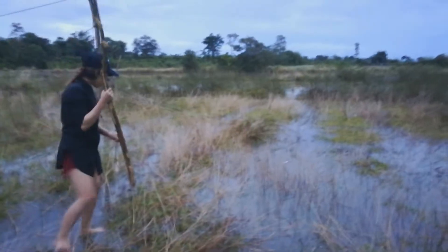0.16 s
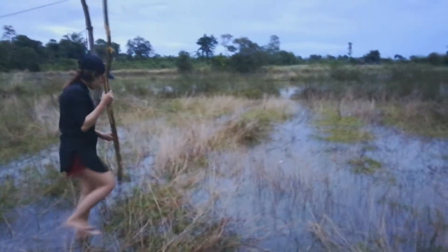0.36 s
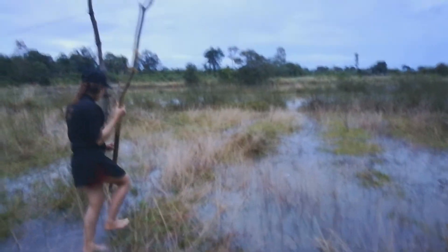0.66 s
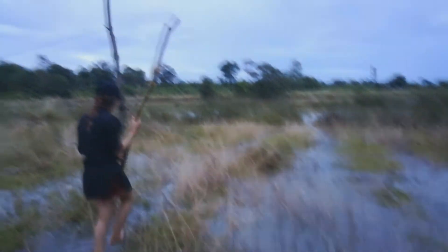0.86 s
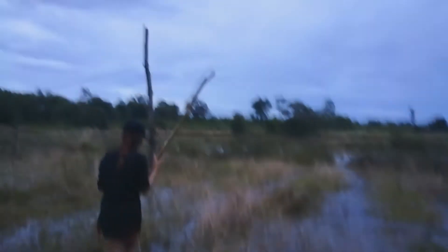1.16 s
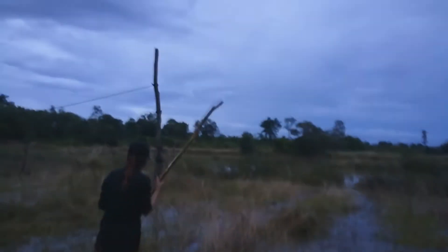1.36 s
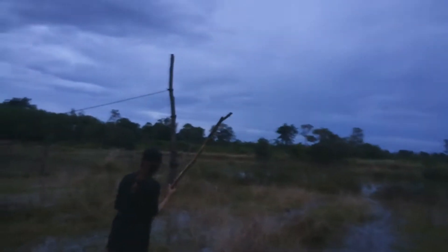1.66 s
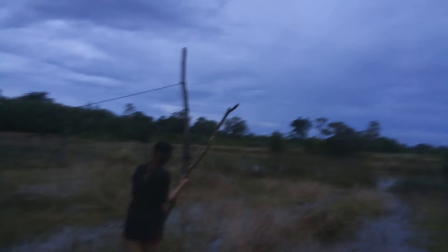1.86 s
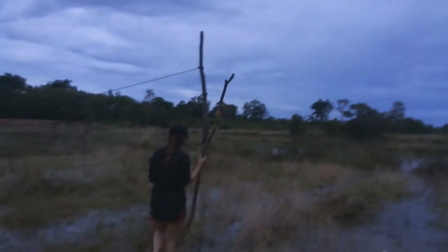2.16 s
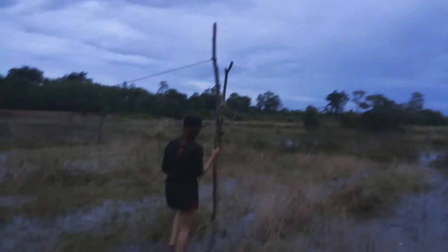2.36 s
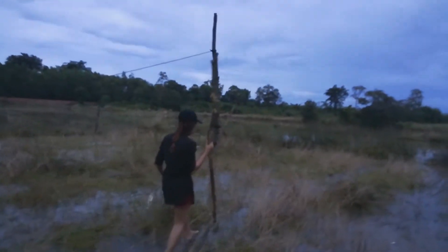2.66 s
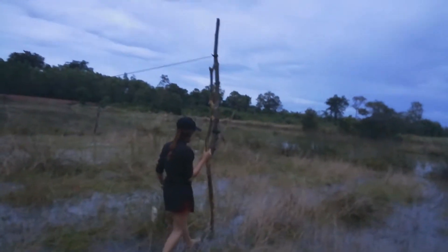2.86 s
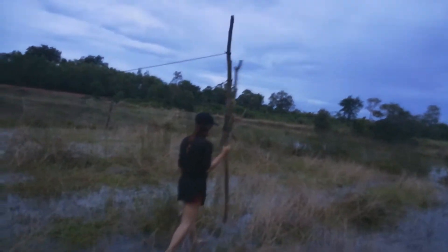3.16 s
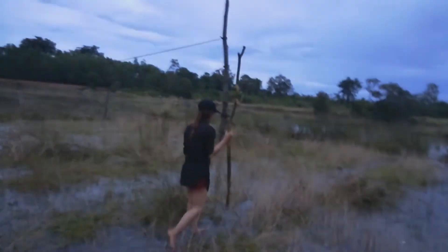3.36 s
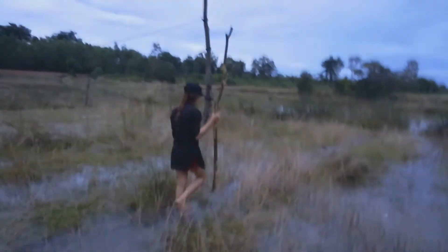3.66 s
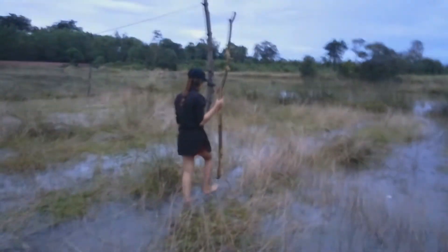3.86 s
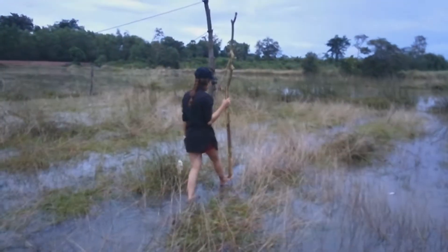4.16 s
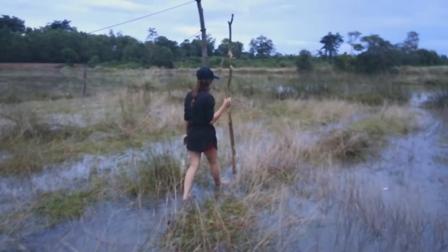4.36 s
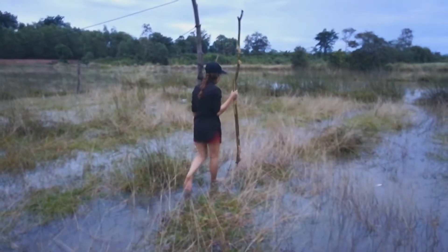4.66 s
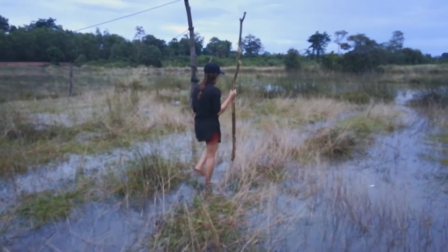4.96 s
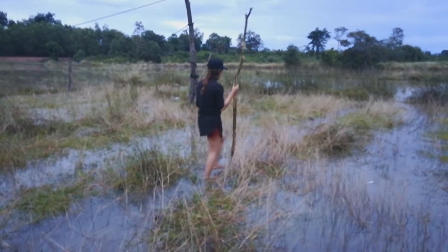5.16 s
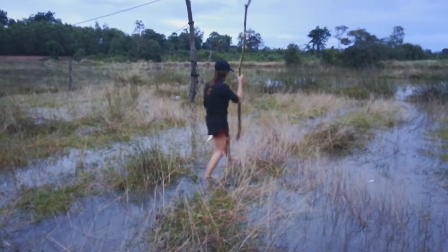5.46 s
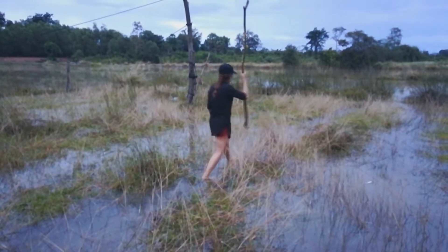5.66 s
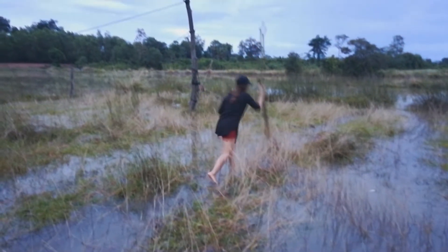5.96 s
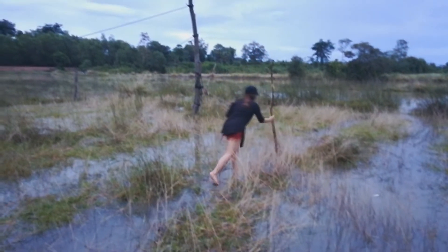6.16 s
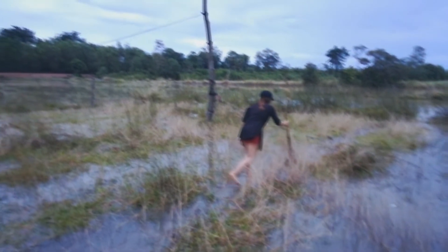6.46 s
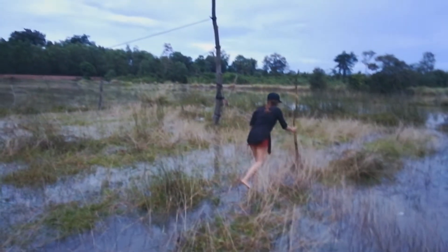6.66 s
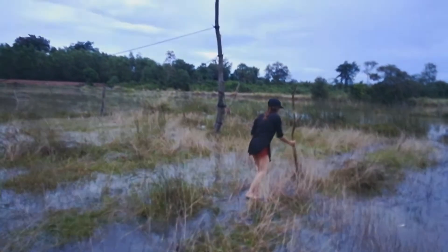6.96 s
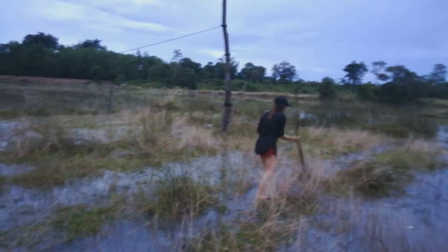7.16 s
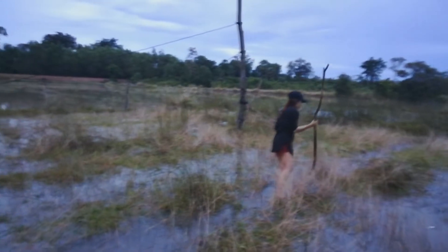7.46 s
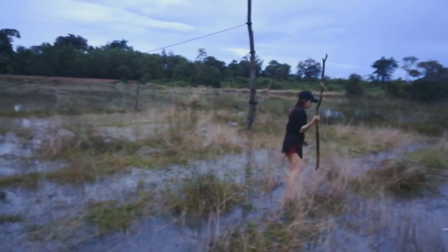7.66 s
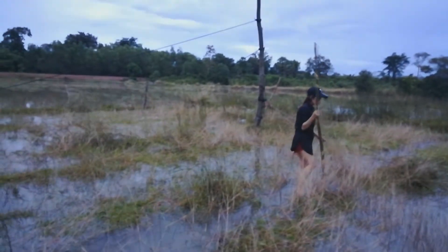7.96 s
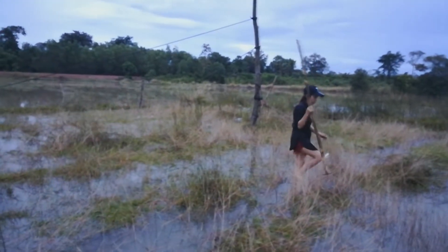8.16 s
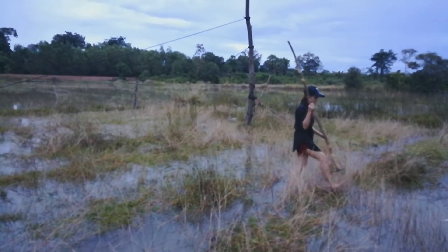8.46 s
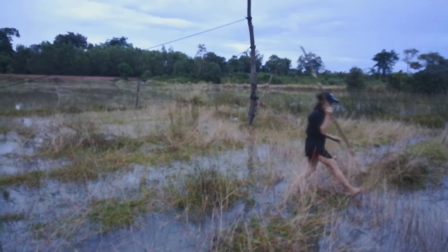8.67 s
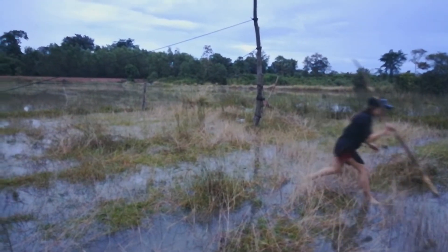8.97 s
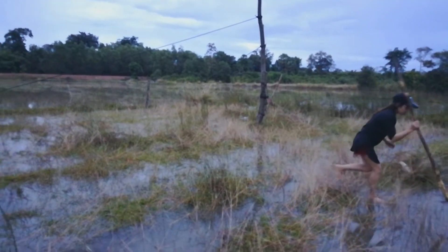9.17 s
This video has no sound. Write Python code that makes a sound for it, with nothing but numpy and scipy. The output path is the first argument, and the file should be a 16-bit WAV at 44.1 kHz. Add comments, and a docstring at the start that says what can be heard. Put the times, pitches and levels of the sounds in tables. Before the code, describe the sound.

Rapid pulsing frog croaks trade turns over a flooded field at dusk, with wet grass rustling, one sharp stick crack, and faint low engine rumble.

```python
"""Nine near frogs croak in turns at dusk over a flooded field: trains of throat pulses excite vocal resonances.
A far chorus overlaps at random; small peeps and drips are gliding tones, and a distant engine rumbles in low bands.
Someone wades through wet grass: noise crackle, ringing snaps, one stick crack, and bubbles of stirred water.
Scattering spreads the field over two ports; the left one is shaded and dull above 7 kHz.
"""
import sys
import numpy as np
from scipy import signal
from scipy.fft import rfft, irfft
from scipy.io import wavfile
from scipy.ndimage import uniform_filter1d

SR = 44100
rng = np.random.default_rng(int(sys.argv[2]) if len(sys.argv) > 2 else 0)


def master_out(mix):
    """Clip the mix to full scale and print it as 16-bit PCM to the path in sys.argv[1]."""
    frames = np.transpose(np.atleast_2d(mix))
    ceiling = np.clip(frames, -1, 1)
    pcm = np.round(ceiling * 32767).astype(np.int16)
    wavfile.write(sys.argv[1], SR, pcm)


def boost(x):
    """Linear amplitude factor 10**(x/20) for a level x in decibels (scalar or array-like)."""
    u = np.asarray(x, float) / 20
    return 10 ** u


N = 410130
TIME = np.arange(N) / SR

# Frogs that repeat one croak: name, croak length/s, opening rate over middle rate, drift of that ratio/(1/s),
# throat gains/dB, voice (attack/s, release/s, sac resonance/Hz, sac peak/dB, left minus right/dB,
# left lag/ms, end rate over middle rate)
FROG_VOICES = [ ("left", .066, 1.12, -.01, [-38, -16, -15, -7, -4, -8, -14, -17, -18, -30, -40, -33],
               (.003, .022, 3650, 8, 2.6, -.43, 1.05)),
               ("middle", .067, 1.04, -.003, [-42, -21, -22, -10, -6, -6, -16, -18, -19, -30, -42, -34],
               (.003, .022, 4050, 7, -.6, -.46, .92)),
               ("falling", .066, 1.17, -.04, [-29, -17, -12, -6, -3, -5, -10, -13, -18, -22, -36, -40],
               (.008, .024, 3400, 3, .4, -.42, .82)),
               ("thin", .048, 1.03, .07, [-36, -23, -28, -6, -3, -3, -12, -21, -18, -25, -38, -21],
               (.006, .016, 3450, 5, -8.5, .02, .95)),
               ("soft", .07, .88, .025, [-32, -21, -31, -20, -5, -3, -12, -22, -42, -48, -52, -56],
               (.025, .028, 4250, 6, -12.5, -.3, .82)),
               ("bright", .061, .92, .02, [-31, -13, -14, -8, -3, -1, -1, -5, -6, -12, -35, -29],
               (.002, .014, 4700, 2, 4.5, -.4, .94)),
               ("near", .063, 1.19, .04, [-30, -18, -21, -11, -5, -5, -11, -16, -13, -31, -36, -34],
               (.004, .02, 3900, 10, -10.5, -.28, .96)),
               ("right", .069, .91, .1, [-32, -21, -27, -18, -5, -3, -6, -15, -23, -36, -39, -29],
               (.003, .028, 3880, 10, -11.5, -.33, .92)), ]


def unit(x):
    """Normalization by the root mean square: scale to rms 1."""
    return x / np.sqrt(np.mean(x ** 2))


def response(points, size=1024):
    """Minimum phase from the folded cepstrum: a causal impulse response through (f/Hz, gain/dB) points."""
    hz, db = np.transpose(points)
    grid = np.fft.rfftfreq(size, 1 / SR) + 1
    gains = boost(np.interp(np.log(grid), np.log(hz), db))
    cepstrum = irfft(np.log(gains))
    cepstrum[1:size // 2] *= 2
    cepstrum[size // 2 + 1:] = 0
    return irfft(np.exp(rfft(cepstrum)))


def colour(x, h):
    """Linear filtering by convolution: pass every channel through an impulse response."""
    return signal.oaconvolve(x, np.atleast_2d(h), axes=1)[:, :N]


def walk(rate):
    """Smoothed random modulation: random levels held 1 / rate s, then averaged twice over that time."""
    hold = int(SR / rate)
    steps = np.repeat(rng.standard_normal(N // hold + 1), hold)
    return 1.3 * uniform_filter1d(uniform_filter1d(steps, hold), hold)[:N]


def add(track, s, sizes):
    """Band-limited impulses: clicks between samples, as short windowed sincs."""
    at = np.clip(s * SR, 8, N - 9)
    taps = np.floor(at)[:, None] + np.arange(-7, 9)
    away = taps - at[:, None]
    kernel = np.sinc(away) * np.cos(np.pi * away / 16) ** 2
    np.add.at(track, taps.astype(int), sizes[:, None] * kernel)


def throat(throat_db, sac_hz, sac_db, slack):
    """Resonant filtering: a tight and a slack throat with vocal sac peaks, scattered by stalks to each port."""
    # Frequencies of the throat gains: f/Hz
    throat_hz = [1400, 2000, 2600, 3200, 3700, 4200, 4900, 5800, 7000, 8300, 10800, 12200]
    sac_width_hz, dulling_db_per_octave = 150, -2
    hz = np.geomspace(600, 16000, 400)
    db = np.interp(np.log(hz), np.log([700, *throat_hz, 13600]), [-70, *throat_db, -57])
    for harmonic in (1, 3):  # the sac also rings at three times its frequency
        detuning = 2 * (hz / harmonic - sac_hz) / sac_width_hz
        db = db + 10 * np.log10(1 + boost(2 * sac_db) / (1 + detuning ** 2))
    dull_db = db + dulling_db_per_octave * np.log2(hz / sac_hz).clip(0)
    # a direct path followed by decaying random reflections, unlike at the two ports
    scatter = rng.standard_normal((2, 512))
    scatter = scatter * boost(-30) * np.exp(-TIME[:scatter.shape[1]] / .0035)
    scatter[:, 0] = 1
    filters = []
    for f, gain_db in ((hz, db), (slack * hz, dull_db)):
        h = signal.convolve(scatter, response(list(zip(f, gain_db)))[None])
        filters.append(h / np.linalg.norm(h, axis=1, keepdims=True))
    return filters


def frog(croaks, throat_db, voice, drop=0, accent_db=-1.2, slack=.975, jitter=.007, breath_db=-20):
    """Source-filter principle: pulses with puffs of breath ring a throat that sinks to slack times its pitch."""
    attack, release, sac_hz, sac_db, pan_db, lag_ms, ending = voice
    drop_s = .019  # the rate falls by the share drop around this time
    pulses, spent = np.zeros((2, N)), np.zeros(N)
    for s, length, start_hz, middle_hz, db in croaks:
        chance = rng.standard_normal((100, 2))
        t = np.arange(0, length, 1 / SR)
        progress = t / length
        # the rate settles quickly, holds, and bends again at the end
        bend_hz = np.where(progress < .5, start_hz - middle_hz, (ending - 1) * middle_hz)
        hz = middle_hz + bend_hz * (2 * progress - 1) ** 2
        hz = hz * (1 - drop / (1 + np.exp((drop_s - t) / .002)))
        # one pulse at each whole turn of the phase
        turns = np.cumsum(hz) / SR
        count = min(int(turns[-1]) + 1, len(chance))
        when = np.interp(np.arange(count), turns, t)
        period = 1 / np.interp(when, t, hz)
        rise = np.clip((when + period) / attack, 0, 1)
        fall = np.clip((length - when) / release, 0, 1) ** .7
        effort = rise * fall * boost(accent_db * np.exp(-when / .012))
        # the square root keeps the power the same at every pulse rate
        sizes = boost(db + 70 * jitter * chance[:count, 1]) * effort * np.sqrt(SR * period)
        when = s + when + jitter * period * chance[:count, 0]
        sizes = sizes * (when > 0)
        add(pulses[0], when + lag_ms / 1000, sizes * boost(pan_db))
        add(pulses[1], when, sizes)
        at = int(s * SR) + np.arange(len(progress))
        spent[at.clip(0, N - 1)] = progress
    puff = unit(np.exp(-np.arange(0, .003, 1 / SR) / .0009)) / np.sqrt(.003 * SR)
    breath = colour(np.abs(pulses), puff) * rng.standard_normal((2, N))
    drive = pulses + boost(breath_db) * breath
    tight, loose = throat(throat_db, sac_hz, sac_db, slack)
    return colour(drive * (1 - spent), tight) + colour(drive * spent, loose)


def croaker(name, length, opening, drift, throat_db, voice):
    """Pulse-rate modulation: a frog repeats one croak while its rate and opening bend drift through the bout."""
    # Croaks of each frog: t/s, level at the right port before field and input gain/dB
    croak_times = { "left": [(1.112, -25), (1.376, -27), (1.609, -26), (1.855, -26.8), (2.11, -28.9),
                   (2.39, -28), (2.622, -28.4), (2.836, -25.5), (3.051, -25.9), (3.262, -27), (3.48, -27.2),
                   (3.7, -26.3), (3.905, -27), (4.118, -27), (4.349, -27)], "middle": [(0.232, -28.5),
                   (0.447, -32), (0.553, -27.5), (0.845, -32), (1.67, -25.9), (1.812, -25.2), (1.979, -27),
                   (2.263, -28.3), (2.539, -28.3), (2.813, -28), (3.11, -28.3), (3.405, -28.5), (4.6, -28)],
                   "falling": [(6.325, -37), (6.555, -33.5), (6.79, -32.8), (7.02, -32), (8.94, -28)],
                   "thin": [(0.755, -27.4), (0.977, -26.1), (1.192, -24.9), (1.405, -23), (2.018, -23.4)],
                   "soft": [(2.968, -37), (3.33, -30.5), (3.59, -28.3), (4.66, -28), (5.212, -29.3),
                   (5.465, -35.3), (5.72, -28.6), (5.982, -32), (6.223, -32.6), (9.141, -25), (9.19, -25)],
                   "bright": [(6.835, -31), (7.101, -30.5), (7.35, -30.2), (7.586, -30.5), (7.811, -30.5),
                   (8.036, -30.5), (8.249, -30.5), (8.475, -30.5), (8.702, -30), (8.93, -29.5),
                   (9.165, -30)], "near": [(-0.024, -17), (0.178, -17), (0.394, -18), (0.601, -19),
                   (0.816, -18)], "right": [(6.973, -23), (7.24, -19.5), (7.48, -21), (7.708, -21),
                   (7.926, -20), (8.141, -20), (8.359, -20), (8.57, -20), (8.791, -20.5), (9.028, -21)], }
    # Mid-croak pulse rate of each frog: t/s, f/Hz
    pulse_rates = {"left": [(1.6, 453), (3.5, 427)], "middle": [(0.3, 456), (3.2, 432)],
                   "falling": [(6.55, 553), (6.8, 513), (8.9, 469)], "thin": [(0.75, 501), (1.2, 464)],
                   "soft": [(3.3, 578), (5.75, 548), (6.2, 491), (9.1, 469)], "bright": [(6.83, 260),
                   (7.1, 360), (8.0, 416)], "near": [(0.4, 486), (0.6, 480)], "right": [(7.25, 448),
                   (7.5, 421), (8.4, 438)]}
    s, db = np.transpose(croak_times[name])
    hz = np.interp(s, *np.transpose(pulse_rates[name]))
    opening_hz = hz * (opening + drift * (s - s[0]))
    return frog(zip(s, length + 0 * s, opening_hz, hz, db), throat_db, voice)


def far_chorus(count=260):
    """Superposition of incoherent sources: many distant frogs overlap at random and hush for a moment."""
    lull_s, lull_width_s, lull_db = 5.65, .5, -9
    croaks = []
    for a, b, c in rng.random((count, 3)):
        s = 9.2 * a
        lull = lull_db * np.exp(-((s - lull_s) / lull_width_s) ** 2)
        croaks.append((s, .07, 400 + 140 * b, 380 + 140 * b, -57 + 11 * c + lull))
    voice = (.02, .02, 3900, 3, -6.5, -.2, .97)  # columns as in FROG_VOICES
    return frog(croaks, FROG_VOICES[1][-2], voice, jitter=.015, breath_db=-8)


def air(db=-63):
    """Incoherent broadband noise: faint hiss of the open field, unrelated at the two ports."""
    # Spectrum of the hiss: f/Hz, gain/dB
    hiss_spectrum = [(150, 2), (600, -11), (1500, -9), (4000, -4), (7000, -14), (9500, -4), (15000, -14)]
    hiss = unit(colour(rng.standard_normal((2, N)), response(hiss_spectrum)))
    return boost(db + 1.5 * walk(2)) * hiss


def engine():
    """Narrow-band noise and a pure tone: wavering low bands and a hum of steady pitch, alike at both ports."""
    # Rumble bands: centre f/Hz, width/Hz, level before the sum is scaled to rms 1/dB
    rumble_bands = [(53, 22, -63), (68, 10, -58), (92, 16, -57), (125, 20, -62), (210, 130, -75)]
    # Rumble through time: t/s, level/dB
    rumble_level = [(1.3, -53), (2.1, -50), (2.6, -58), (3.3, -50), (4.6, -56), (5.8, -52.5), (8.0, -54),
                    (9.1, -52)]
    # Hum through time: t/s, level/dB
    hum_level = [(1.0, -85), (4.5, -73), (9.0, -77)]
    hum_hz = 270.7
    rumble = 0
    for hz, width, db in rumble_bands:
        band = signal.butter(2, [hz - width / 2, hz + width / 2], "band", fs=SR, output="sos")
        noise = unit(signal.sosfilt(band, rng.standard_normal(N)))
        rumble = rumble + boost(db + 1.5 * walk(1.3)) * noise
    hum_db = np.interp(TIME, *np.transpose(hum_level)) + 1.5 * walk(.8)
    hum = boost(hum_db) * np.sqrt(2) * np.sin(2 * np.pi * hum_hz * TIME)
    return unit(rumble) * boost(np.interp(TIME, *np.transpose(rumble_level))) + hum


def ring(s, hz, db, t60):
    """Damped oscillation: one struck mode that decays exponentially, 60 dB in t60 seconds."""
    t = np.clip(TIME - s, 0, 3 * t60)
    onset = np.clip(t * hz / 1.3, 0, 1)
    return boost(db - 60 * t / t60) * np.sin(2 * np.pi * hz * t) * onset * (t < 3 * t60)


def wet_grass():
    """Shot noise: dense crackle of wet stalks over hiss, swelling with each stride."""
    # Strides: t/s, length/s, level before slow random wavering/dB
    strides = [(3.7, .16, -50), (5.24, .65, -54), (6.072, .05, -39), (6.12, .2, -54), (6.3, .48, -46.5),
               (8.68, .2, -49), (8.88, .42, -52)]
    # Spectrum of the crackle and hiss: f/Hz, gain/dB
    grass_spectrum = [(450, -26), (1200, -13), (4500, -6), (6800, -18), (9000, 0), (12200, -5),
                      (15500, -12)]
    rise, fall = .12, .25  # shares of the stride
    gain = 0
    for s, length, db in strides:
        ramp = np.minimum((TIME - s) / rise, (s + length - TIME) / fall) / length
        gain = gain + boost(db) * np.clip(ramp, 0, 1) ** 2
    struck = rng.random(N) < .02 * boost(5.5 * walk(60))
    ticks = boost(2.6 * rng.exponential(size=N)) * struck * rng.standard_normal(N)
    crackle = unit(ticks) + .7 * rng.standard_normal((2, N))
    return unit(colour(crackle, response(grass_spectrum))) * gain * boost(3 * walk(14))


def snapping_stalks():
    """Impulsive fracture: a ringing tick inside a longer burst of splinters, high-passed."""
    # Snaps: t/s, tick scale before the high-pass/dB, ring f/Hz
    snap_rows = [(0.0674, -33, 10800), (1.5224, -26.5, 6760), (3.8082, -22, 8910), (3.8237, -19, 11500),
                 (6.0766, -9.5, 9780), (6.0804, -9.5, 10100), (6.553, -26, 5000), (6.6308, -27.5, 6300),
                 (9.0189, -28, 6150)]
    snaps = np.zeros(N)
    t = np.arange(0, .012, 1 / SR)
    for s, db, hz in snap_rows:
        tick = np.sin(2 * np.pi * hz * t) * np.exp(-t / .0012)
        splinters = .45 * rng.standard_normal(len(t)) * np.exp(-t / .0025)
        snaps[int(s * SR):][:len(t)] += boost(db) * (tick + splinters)
    return signal.sosfilt(signal.butter(2, 3500, "high", fs=SR, output="sos"), snaps)


def stick_crack():
    """Modal superposition: one crack sets off all the modes of a stick together."""
    # Modes of the stick: f/Hz, level relative to the crack/dB, t60/s
    stick_modes = [(4700, 0, .005), (900, -22, .01), (330, -36, .03), (2300, -15, .006), (9500, -22, .004)]
    crack_s, crack_db = 6.0965, 3.5
    return sum(ring(crack_s, hz, crack_db + db, t60) for hz, db, t60 in stick_modes)


def wading():
    """Level panning: grass, snaps and the stick crack are all weaker at the left port."""
    sharp = snapping_stalks() + stick_crack()
    return wet_grass() * boost([[-4.5], [0]]) + sharp * boost([[-8.5], [0]])


def gliding_tones(rows, count):
    """Frequency modulation of a harmonic series: short tones of count partials glide, then are high-passed."""
    db_per_partial = -3.5
    out = np.zeros(N)
    for s, length, hz, rise, db in rows:
        progress = np.arange(int(length * SR)) / (length * SR)
        phase = 2 * np.pi * np.cumsum(hz * (1 + rise * progress)) / SR
        partial_db = db_per_partial * np.arange(count) + 3 * rng.standard_normal(count)
        tone = sum(boost(partial_db[k]) * np.sin((k + 1) * phase) for k in range(count))
        out[int(s * SR):][:len(progress)] += boost(db) * unit(tone) * np.sqrt(np.sin(np.pi * progress))
    out = signal.sosfilt(signal.butter(1, 3500, "high", fs=SR, output="sos"), out)
    return np.array([out * boost(-7.5), out])


def peeps():
    """Harmonic synthesis: small squeaks of six partials."""
    # Peeps: t/s, length/s, starting f/Hz, rise as a share of f, level before envelope and high-pass/dB
    peep_rows = [(1.33, .022, 2000, 0, -46), (1.455, .028, 1720, .23, -40), (2.455, .022, 1450, .02, -30),
                 (5.08, .026, 2100, -.05, -43), (6.632, .016, 1800, 0, -43), (7.317, .01, 1950, 0, -34),
                 (8.483, .014, 2400, 0, -31)]
    return gliding_tones(peep_rows, count=6)


def drips():
    """Gliding sinusoid: each water drip is a single rising tone."""
    # Drips: t/s, length/s, starting f/Hz, rise as a share of f, level before envelope and high-pass/dB
    drip_rows = [(2.785, .04, 900, .5, -51), (3.42, .025, 950, .15, -52), (5.55, .04, 960, .05, -54)]
    return gliding_tones(drip_rows, count=1)


def rasping_frog():
    """Falling pulse rate: hard-edged bursts open loud and slow down as they go."""
    # Bursts: t/s, length/s, opening pulse rate f/Hz, level at the right port before accent and field/dB
    bursts = [(3.663, .038, 430, -25), (3.879, .033, 410, -22), (3.914, .058, 330, -19),
              (3.979, .026, 360, -24), (4.008, .03, 360, -22), (4.148, .05, 450, -22),
              (4.2, .019, 345, -19), (4.228, .039, 250, -20), (4.27, .016, 340, -29),
              (4.375, .09, 428, -20), (4.568, .084, 432, -20), (4.756, .084, 440, -20.5),
              (4.939, .083, 432, -19.5), (5.118, .029, 428, -20), (5.166, .022, 371, -20.5),
              (5.205, .017, 290, -23), (7.413, .02, 424, -24.3), (7.441, .033, 210, -25),
              (7.549, .036, 213, -37), (7.645, .045, 430, -25), (7.792, .026, 428, -21),
              (7.85, .026, 350, -22), (7.881, .03, 286, -25.7), (8.011, .029, 432, -20.6),
              (8.07, .03, 330, -23.5), (8.11, .012, 300, -26), (8.249, .034, 428, -23),
              (8.313, .019, 332, -24.3), (8.497, .038, 424, -20.5), (8.57, .025, 430, -28),
              (8.73, .04, 330, -27), (8.96, .04, 420, -25), (9.18, .05, 420, -25)]
    # Throat gains at the shared throat frequencies: gain/dB
    rasp_throat = [-27, -26, -27, -9, -3, -6, -11, -27, -28, -33, -24, -36]
    # Voice, columns as in FROG_VOICES: attack/s, release/s, sac f/Hz, sac peak/dB, left minus right/dB,
    # left lag/ms, end rate over middle rate
    rasp_voice = (.0006, .013, 3650, 7, -8.0, .3, .85)
    sag_per_s = 1.5  # share of the rate
    croaks = []
    for s, length, hz, db in bursts:
        middle_hz = hz * (1 - sag_per_s * length / 2)
        croaks.append((s, length, hz, middle_hz, db))
    return frog(croaks, rasp_throat, rasp_voice, drop=.16, accent_db=3, slack=.96, jitter=.02, breath_db=-16)


def splashes(most=40):
    """Bubble resonance: stirred water gives short damped tones that rise as they die."""
    # Stirring feet: t/s, length/s, level of the weakest bubbles/dB
    stirs = [(5.72, .14, -58), (6.33, .28, -56), (8.9, .17, -58)]
    bubbles_per_s, centre_hz, octaves = 160, 1050, .65  # at most `most` bubbles a stir
    cycles, rise = 5, .3  # amplitude decay in cycles; final rise as a share of the pitch
    out = np.zeros(N)
    for s, length, db in stirs:
        for a, b, c in rng.random((most, 3))[:int(bubbles_per_s * length) + 1]:
            hz = centre_hz * 2 ** (octaves * (2 * b - 1))
            turns = np.arange(int(3 * cycles * SR / hz)) * hz / SR
            glide = 1 + rise * turns / cycles / 6
            tone = np.sin(2 * np.pi * turns * glide) * np.exp(-2 * turns / cycles)
            tone = boost(db + 14 * c) * tone * np.clip(turns / 2, 0, 1)
            out[int((s + a * length) * SR):][:len(tone)] += tone
    return np.array([out * boost(-7), out])


def field(x):
    """Diffuse scattering: quick echoes off reeds and water, and a thin slow tail from the tree line."""
    t = np.arange(0, .6, 1 / SR)
    tail = 0
    for db, t60 in ((-12, .07), (-17.5, .5)):  # level/dB, t60/s
        shape = boost(-60 * t / t60) * np.clip(t / .004, 0, 1)
        tail = tail + boost(db) * shape / np.linalg.norm(shape) * rng.standard_normal((2, len(t)))
    dull = signal.sosfilt(signal.butter(1, 10000, fs=SR, output="sos"), x.mean(axis=0))
    return x + colour(np.array([dull * boost(-3.5), dull]), tail)


def shade_left(x):
    """Acoustic shadowing: the covered left port loses its treble."""
    # Response of the left port: f/Hz, gain/dB
    port_response = [(200, 0), (600, -4), (2000, 0), (5500, 0), (7200, -9), (8300, -23), (15000, -21)]
    x[:1] = colour(x[:1], response(port_response))
    return x


def scene():
    """Superposition: frogs, water and wading echo over the field; the rumble reaches both ports alike."""
    near = sum(croaker(*one) for one in FROG_VOICES) + rasping_frog()
    near = near + wading() + peeps() + drips() + splashes()
    heard = field(near + far_chorus()) + air()
    return shade_left(heard) + engine()


def roll_off(x):
    """The treble ends steeply here."""
    return signal.sosfilt(signal.butter(12, 16100, fs=SR, output="sos"), x)


def record(dry):
    """Amplitude saturation: a little input gain, then the converter clips at full scale."""
    mix = np.clip(boost(1.2) * dry, -1, 1)
    return roll_off(mix)


dry = scene()
out = record(dry)
master_out(out)
```